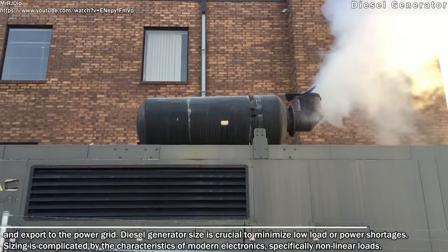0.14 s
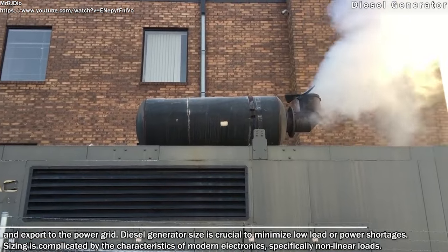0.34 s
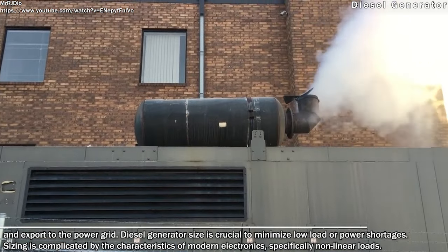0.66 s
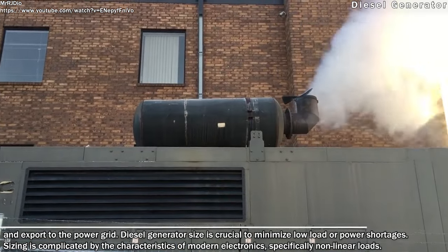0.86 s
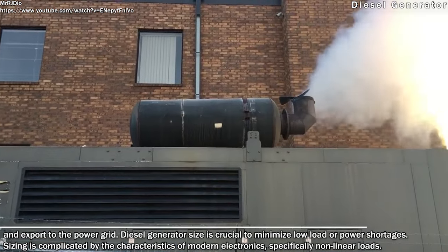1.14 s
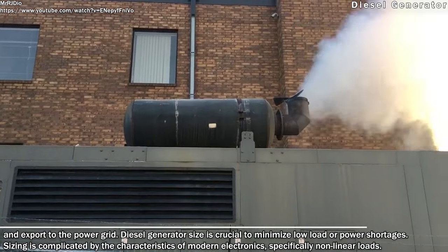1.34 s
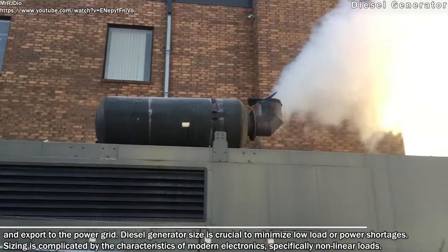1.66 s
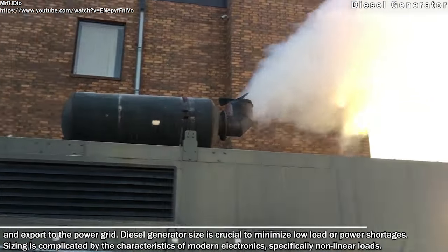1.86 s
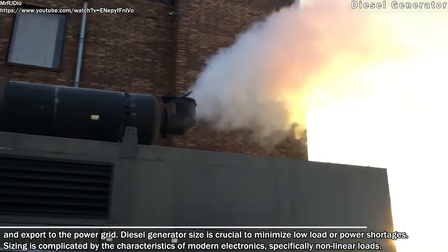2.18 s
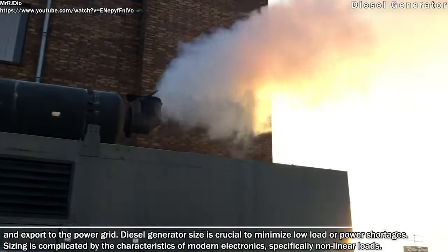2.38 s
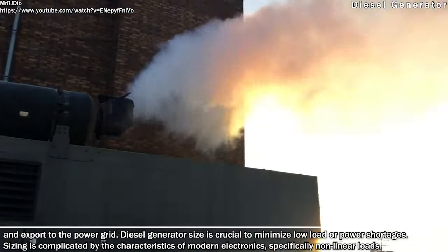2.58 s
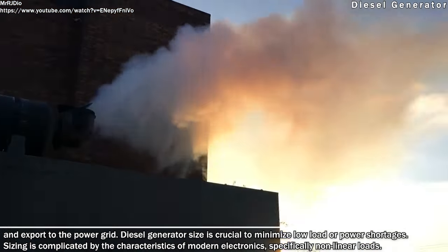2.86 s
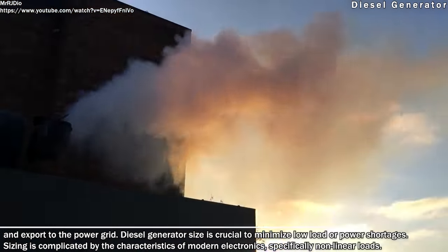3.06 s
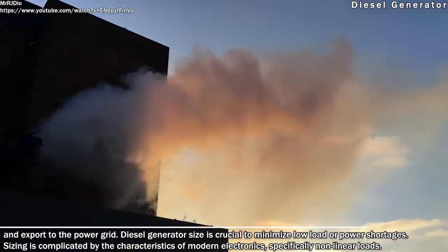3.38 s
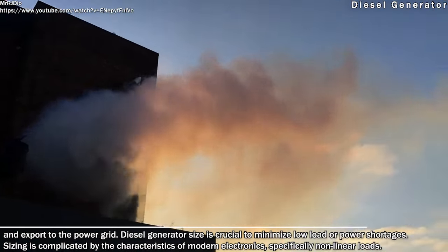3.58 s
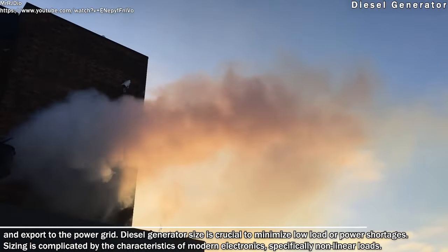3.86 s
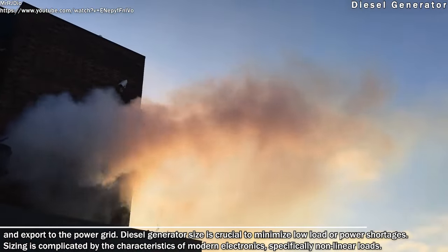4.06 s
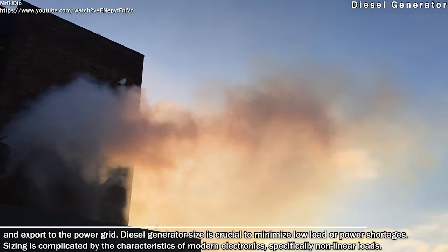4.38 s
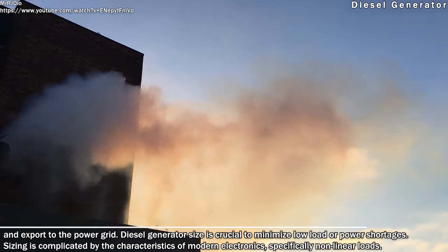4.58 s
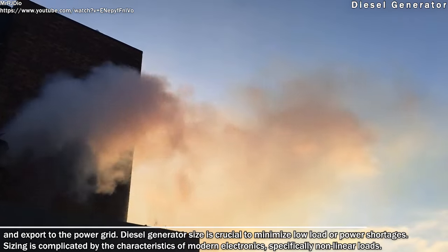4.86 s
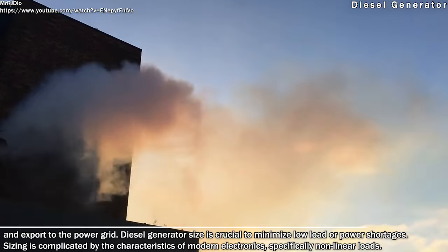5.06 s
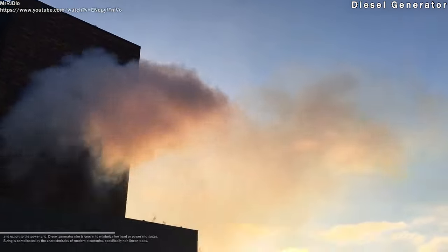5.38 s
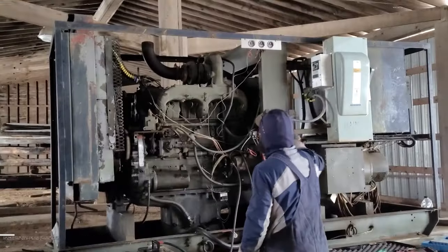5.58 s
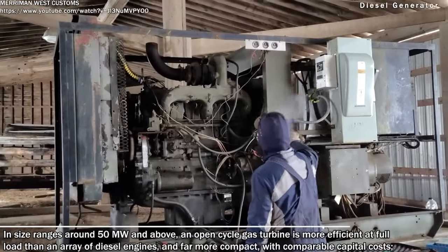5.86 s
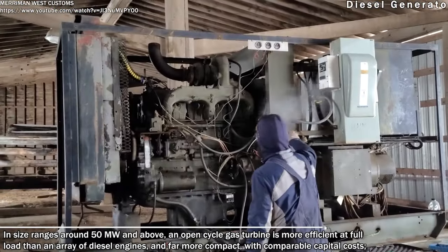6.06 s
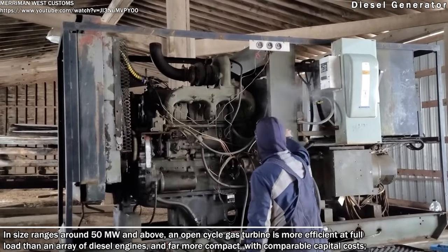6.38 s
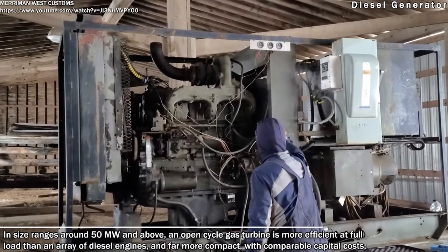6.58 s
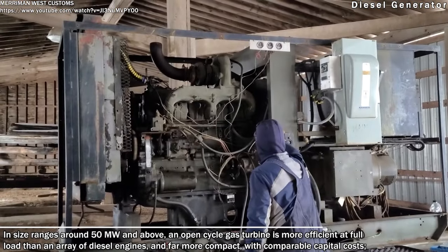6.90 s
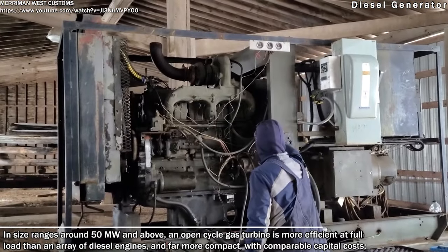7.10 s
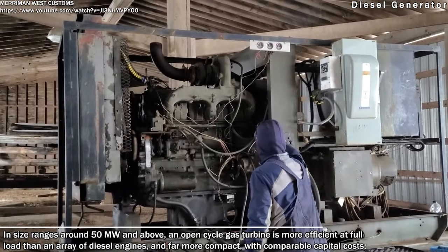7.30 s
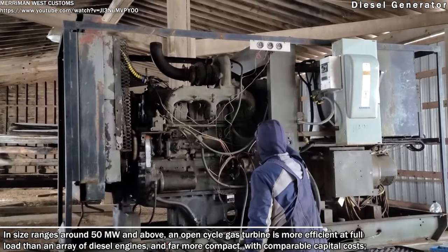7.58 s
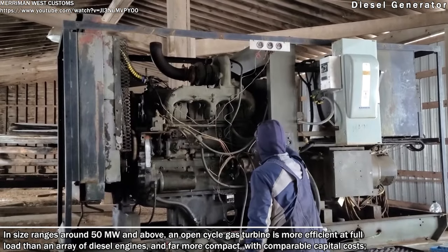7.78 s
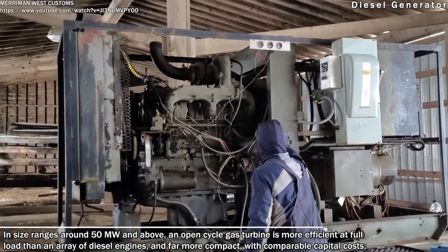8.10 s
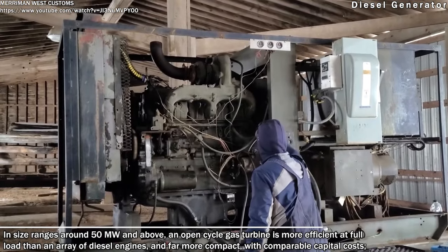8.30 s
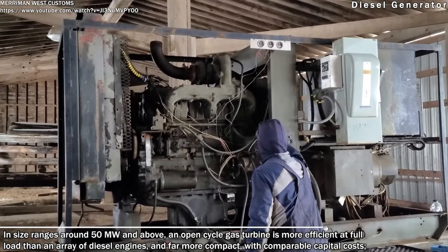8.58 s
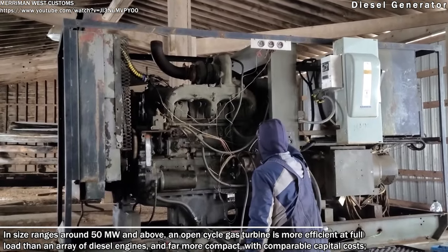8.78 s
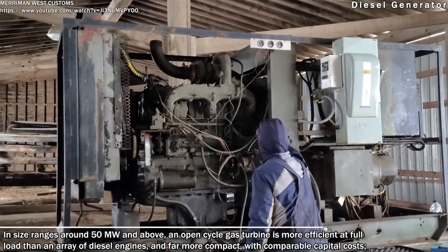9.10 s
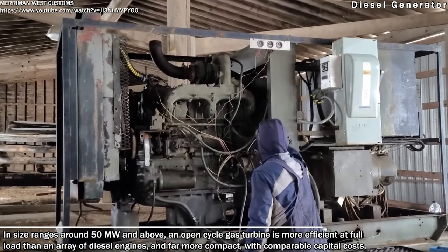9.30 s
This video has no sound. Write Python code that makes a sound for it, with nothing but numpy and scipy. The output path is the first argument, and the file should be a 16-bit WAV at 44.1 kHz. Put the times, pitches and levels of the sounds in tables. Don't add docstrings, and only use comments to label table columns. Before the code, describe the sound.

Loud steady generator drone outdoors, abruptly replaced by a quieter low engine idle in a shed, with thuds, a spray burst, ticks and a final metallic slam.

```python
import sys
import numpy as np
from scipy import signal
from scipy.fft import rfft, irfft, next_fast_len
from scipy.io import wavfile

SR = 44100
rng = np.random.default_rng(int(sys.argv[2]) if len(sys.argv) > 2 else 0)


def amplitude_ratio(level_db):
    exponent = np.asarray(level_db, float) / 20
    return 10 ** exponent


def unload_audio(sound):
    columns = np.transpose(np.atleast_2d(sound))
    steps = np.round(np.clip(columns, -1, 1) * 32767)
    wavfile.write(sys.argv[1], SR, steps.astype(np.int16))


N = 416304
TIME = np.arange(N) / SR
CUT_S = 5.5948
CYCLE_HZ = 15.0156
CLACK_S, ENGAGE_S, HEAVE_S = 9.3535, 9.411, 9.425


def unit(x):
    return x / np.sqrt(np.mean(x ** 2) + 1e-20)


def curves(rows):
    s, *cols = np.transpose(rows)
    return [np.interp(TIME, s, c) for c in cols]


def wobble(rate):
    knots = rng.standard_normal(int(N * rate / SR) + 4)
    return np.interp(TIME * rate, np.arange(len(knots)), knots)


def noise(response):
    m = next_fast_len(N)
    spectrum = rfft(rng.standard_normal(m)) * response(np.fft.rfftfreq(m, 1 / SR))
    return unit(irfft(spectrum, m)[:N])


def coloured(points):
    f, db = np.transpose(points)
    return lambda hz: amplitude_ratio(np.interp(np.log(hz + 1), np.log(f + 1), db))


def resonant(peaks):
    def response(f):
        total = 0
        for k, (centre, width, db) in enumerate(peaks):
            damping = 1j * f * width
            total = total + (-1) ** k * amplitude_ratio(db) * damping / (centre ** 2 - f ** 2 + damping)
        return total
    return response


def sharp(peaks):
    return lambda f: resonant(peaks)(f) ** 2


def tone(turns, db):
    return np.sqrt(2) * amplitude_ratio(db) * np.cos(2 * np.pi * turns)


def strike(t, db, rise, t60):
    return amplitude_ratio(db - 60 * t / t60) * (1 - np.exp(-t / rise))


def contacts(rows):
    out = np.zeros(N)
    for s, db, rise, t60 in rows:
        first = round(s * SR)
        out[first:] += strike(TIME[:N - first], db, rise, t60)
    return out


def shed_air():
    # frequency in Hz, level in dB per Hz.
    shed_spectrum = [(15, -45), (30, -19.5), (133, -9.5), (227, -22.5), (276, -20.5), (345, -26),
                     (969, -44), (1690, -43.5), (2000, -54), (2800, -53), (5950, -70), (6840, -84),
                     (8400, -82), (8800, -76), (12500, -77), (13200, -100)]
    return amplitude_ratio(-37 + 0.61 * wobble(9)) * noise(coloured(shed_spectrum))


def distant_engine():
    # time in seconds, idle speed in cycles per second.
    idle_speed = [(5.85, 5.55), (6.15, 5.604), (6.45, 5.672), (6.75, 5.686), (7.05, 5.688), (7.35, 5.706),
                  (7.65, 5.742), (7.95, 5.716), (8.25, 5.694), (8.55, 5.906), (8.85, 5.886), (9.15, 5.8)]
    # multiple of the cycle rate, level in dB at low idle, level in dB at faster idle.
    idle_orders = [(7, -49, -49), (8, -36, -38), (10, -45, -44), (11, -46, -44), (13, -49, -50),
                   (16, -36, -34), (18, -48, -40), (19, -31, -42), (21, -41, -39), (23, -47, -49),
                   (24, -31, -38), (27, -47, -54), (28, -52, -57), (29, -51, -48), (32, -50, -57),
                   (35, -48, -55), (45, -59, -55), (47, -48, -54), (48, -54, -59), (50, -55, -56),
                   (54, -58, -63)]
    # rattle's place in the cycle (0-1), length in cycles, level in dB.
    valve_rattles = [(0.21, 0.06, -2), (0.81, 0.1, -6), (0, 0.08, -6.5)]
    # panel resonance in Hz, width in Hz, level in dB.
    panel_modes = [(1700, 180, 4), (2810, 230, -1.5)]
    throttle_s, rise_s = 8.46, 0.05
    creep = 0.08
    cycles = np.cumsum(curves(idle_speed)[0]) / SR
    opening = 1 / (1 + np.exp((throttle_s - TIME) / rise_s))
    load = creep * (TIME - CUT_S) / (throttle_s - CUT_S) + (1 - creep) * opening
    load = np.clip(load, 0, 1)
    hunt = 0.0015 * (1 + 4 * load) * wobble(5)
    drone = np.zeros(N)
    for k, slow, fast in idle_orders:
        start = 0.054 * k - 0.8 if slow > -42 else rng.random()
        level = slow + (fast - slow) * load + (1 + load) * wobble(3)
        drone += tone(k * (cycles + hunt) + start, level)
    gate = 0.19
    for place, length, db in valve_rattles:
        gate = gate + amplitude_ratio(db) * np.exp(-((cycles % 1 - place) / length) ** 2)
    rattle = amplitude_ratio(-56.5 + 1.5 * wobble(8)) * gate * noise(sharp(panel_modes))
    return drone + rattle


def soft_thuds():
    # start in seconds, peak level in dB, frequency in Hz.
    thud_events = [(5.636, -19, 60), (5.83, -19, 60), (6.985, -18, 65), (9.0, -25.5, 55), (9.3, -24, 60),
                   (9.335, -19, 60)]
    out = np.zeros(N + SR)
    t = TIME[:SR // 4]
    for s, db, hz in thud_events:
        out[round(s * SR):][:len(t)] += strike(t, db, 0.0031, 0.13) * np.sin(2 * np.pi * hz * t)
    return out[:N]


def spray_can():
    # frequency in Hz, level in dB per Hz.
    nozzle_spectrum = [(1500, -26), (3900, -12), (4300, -17), (4800, -12), (6300, -30), (8000, -48),
                       (9800, -22), (11500, -31)]
    # resonance where the jet meets the intake in Hz, width in Hz, level in dB.
    jet_modes = [(2050, 500, 0), (2350, 250, -3)]
    open_s, hold_s, slope = 6.55, 0.14, 170
    opening = np.clip(open_s - TIME, 0, None)
    closing = np.clip(TIME - open_s - hold_s, 0, None)
    valve_db = -slope * (opening + closing)
    hiss = noise(lambda f: coloured(nozzle_spectrum)(f) / (1 + (f / 15000) ** 12))
    spray = amplitude_ratio(-66 + valve_db + 1.8 * wobble(60)) * hiss
    impinging = amplitude_ratio(-61) * np.exp(-((TIME - 6.66) / 0.078) ** 2)
    return spray + impinging * noise(sharp(jet_modes))


def tool_ticks():
    # start in seconds, peak level in dB, t60 in seconds, brightness as a gain on the edge.
    tick_events = [(6.958, -53, .14, .15), (8.246, -56, .1, .5), (8.416, -45, 0.12, 1.3),
                   (8.445, -48, .05, .3)]
    # resonance in Hz, width in Hz, level in dB.
    body_modes = [(900, 300, -6), (1350, 200, 7), (2390, 150, 2), (3100, 400, -11)]
    edge_modes = [(4200, 700, -4), (5200, 450, 1), (8700, 350, -3), (9800, 350, -1), (11300, 600, -5)]
    knocks = np.zeros((2, N + SR))
    t = TIME[:SR // 4]
    for s, db, t60, bright in tick_events:
        knocks[:, round(s * SR):][:, :len(t)] += np.outer([1, bright], strike(t, db, 0.0008, t60))
    body = noise(lambda f: resonant(body_modes)(f) / (1 + (f / 4500) ** 8))
    edge = amplitude_ratio(-18) * noise(sharp(edge_modes))
    return knocks[0, :N] * body + knocks[1, :N] * edge


def starter():
    # start in seconds, level in dB, rise in seconds, t60 in seconds.
    block_contacts = [(CLACK_S, -26.5, 0.025, 3), (ENGAGE_S, -17, .006, 3), (HEAVE_S, -13.5, .003, 3)]
    whirr_contacts = [(CLACK_S, -24, .001, 1.5), (ENGAGE_S, -9, 0.0066, 0.17)]
    scrape_contacts = [(CLACK_S, -17.5, .0005, 0.028), (CLACK_S, -27, .01, 0.25),
                       (ENGAGE_S, -29, .0015, .6)]
    # resonance in Hz, width in Hz, level in dB.
    block_modes = [(271, 98, -2), (397, 120, -1), (520, 110, -3.5), (785, 350, -9.5)]
    gear_modes = [(1420, 250, 3), (2000, 320, -2), (2460, 200, 2), (3260, 500, -7.5), (4300, 700, -16),
                  (6600, 600, -20)]
    # frequency in Hz, level in dB per Hz.
    scrape_spectrum = [(2500, -23), (3800, 3), (5000, -6), (7000, -3), (10000, -5), (13000, 0),
                       (15500, -13), (16000, -63.5)]
    # blow in seconds, peak level in dB.
    metal_blows = [
        (9.3545, -26),
        (9.4126, -8.5),
    ]
    # mode in Hz, level in dB, t60 in seconds.
    pinion_modes = [(1405, -10, .06), (2514, 3, .05), (3250, -12, .045), (3655, -15, .05), (6331, -16, .04)]
    teeth = amplitude_ratio(2 * wobble(700))
    metal = contacts(whirr_contacts) * noise(resonant(gear_modes))
    metal += contacts(scrape_contacts) * noise(coloured(scrape_spectrum))
    out = contacts(block_contacts) * noise(resonant(block_modes)) + teeth * metal
    for s, db in metal_blows:
        first = round(s * SR)
        t = TIME[:N - first]
        for hz, level, t60 in pinion_modes:
            out[first:] += strike(t, db + level, 0.002, t60) * np.sin(2 * np.pi * hz * t)
    return out


def generator_roar():
    # frequency in Hz, level in dB per Hz.
    rumble_spectrum = [(70, -58), (113, -12.5), (140, -5), (165, -1.5), (200, -4.5), (235, -8),
                       (270, -11.5), (320, -24.5), (420, -50), (700, -120)]
    ground_spectrum = [(15, -45), (25, -24), (40, -5.5), (62, -4.5), (85, -1), (110, -4.5), (140, -16),
                       (200, -69)]
    casing_spectrum = [(160, -20.5), (270, -8), (380, -10), (475, -13.5), (681, -12.5), (834, -17),
                       (900, -14.5), (990, -15), (1200, -15), (1400, -18.5), (1860, -17), (2410, -19.5),
                       (3020, -17.5), (4000, -37.5), (8800, -120)]
    air_spectrum = [(2060, -38), (3500, -10), (3970, -5.5), (4950, -7.5), (5510, -5), (6830, -6),
                    (7700, -9.5), (8840, -6), (10600, -14), (14000, -13), (15100, -15.5), (15800, -26)]
    # enclosure panel resonance in Hz, width in Hz, level in dB.
    door_modes = [(364.4, 28, 0), (469, 12.4, -3), (697, 20, -5.5), (896, 18, -9.5), (986.5, 25, -4),
                  (1218, 18, -6.5), (1790, 30, -9)]
    pattern = noise(coloured(casing_spectrum))[:round(SR / CYCLE_HZ)]
    repeat = np.interp(TIME * CYCLE_HZ % 1, np.linspace(0, 1, len(pattern)), unit(pattern))
    turn_db = -0.1737 * TIME
    casing_db, air_db = -23 + turn_db, -37.5 + turn_db
    flutter = wobble(14) + 1.16 * wobble(45)
    rumble = amplitude_ratio(-22 + 1.8 * wobble(6)) * noise(coloured(rumble_spectrum))
    ground_db = -26.5 + 0.6 * (TIME - CUT_S / 2) + 1.8 * wobble(4.6)
    ground = amplitude_ratio(ground_db) * noise(coloured(ground_spectrum))
    doors = amplitude_ratio(casing_db - 12.5 + 3.4 * wobble(4.02)) * noise(sharp(door_modes))
    casing = amplitude_ratio(casing_db - 1 + 0.58 * flutter + 0.73 * wobble(120))
    casing *= noise(coloured(casing_spectrum)) + 0.2 * repeat
    air_db = air_db + 0.37 * flutter + 0.51 * wobble(5.02) + 0.59 * wobble(250)
    air = amplitude_ratio(air_db) * noise(coloured(air_spectrum))
    return rumble + ground + doors + casing + air


def generator_tones():
    # multiple of the base rate, level in dB.
    exhaust_orders = [(3, -35), (5, -40), (6, -30), (9, -36), (10, -38), (11, -34), (12, -39), (14, -43),
                      (16, -20.5), (17, -41), (18, -35), (19, -41), (22, -43), (24, -40), (27, -46),
                      (28, -42), (34, -44), (42, -45), (45, -47), (60, -43.5), (65, -48), (66, -44),
                      (72, -47), (74, -50), (76, -49), (81, -47), (108, -52), (120, -48)]
    blade_orders = [(1, -18.5), (2, -37), (3, -44)]
    blade_hz = 235.118
    lines = np.zeros(N)
    for k, db in exhaust_orders:
        start = 0.03 if k == 16 else rng.random()
        depth_db = 0.8 if k == 16 else 2.5
        lines += tone(k * CYCLE_HZ * TIME + start, db + depth_db * wobble(3))
    for k, db in blade_orders:
        lines += tone(k * blade_hz * TIME, db + 0.35 * wobble(2.67))
    return lines


def scene():
    shed = shed_air() + distant_engine() + soft_thuds() + spray_can() + tool_ticks() + starter()
    yard = generator_roar() + generator_tones()
    left_only = np.array([[1], [0]])
    return yard * (np.arange(N) < round(CUT_S * SR)) + shed * (TIME >= CUT_S) * left_only


def low_pass(x):
    return signal.sosfilt(signal.butter(12, 15950, fs=SR, output="sos"), x)


def record(dry):
    mix = dry / (1 + np.abs(dry / 1.1) ** 8) ** (1 / 8)
    return low_pass(mix)


dry = scene()
out = record(dry)
unload_audio(out)
```